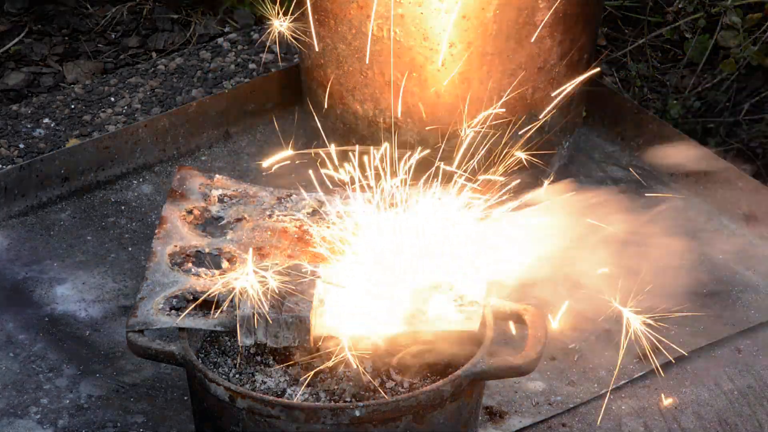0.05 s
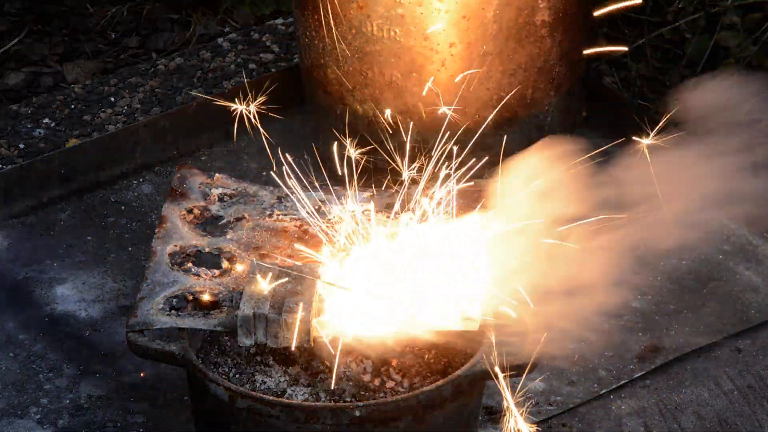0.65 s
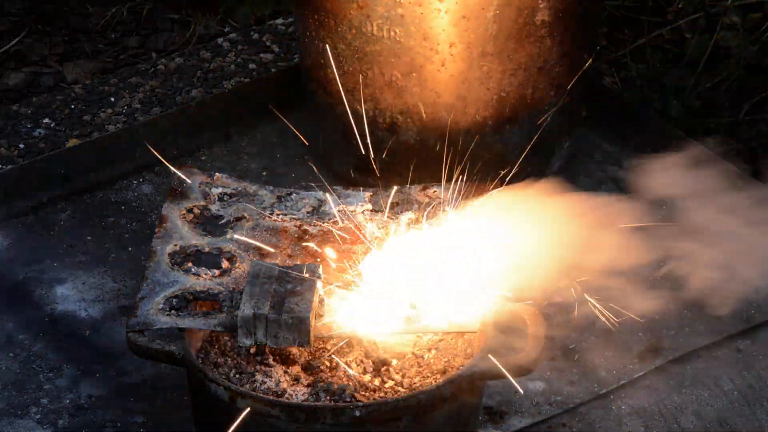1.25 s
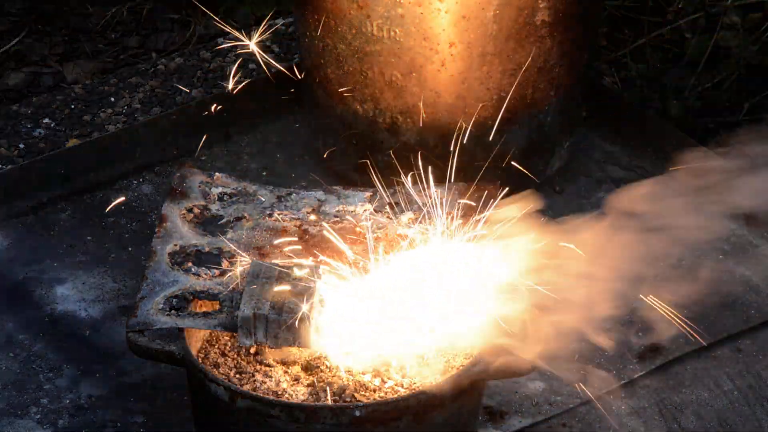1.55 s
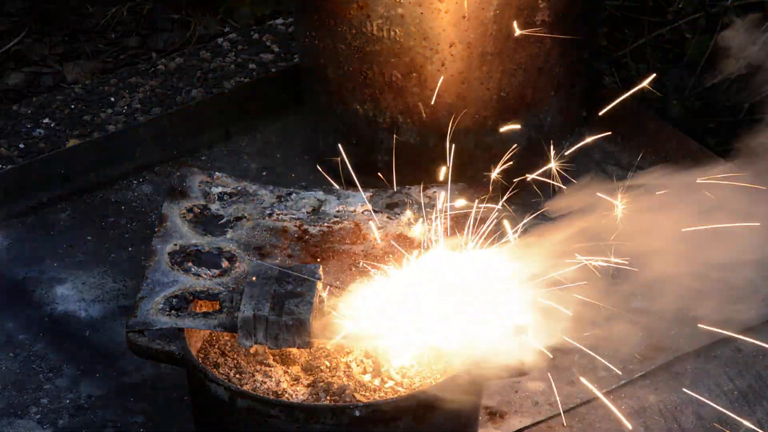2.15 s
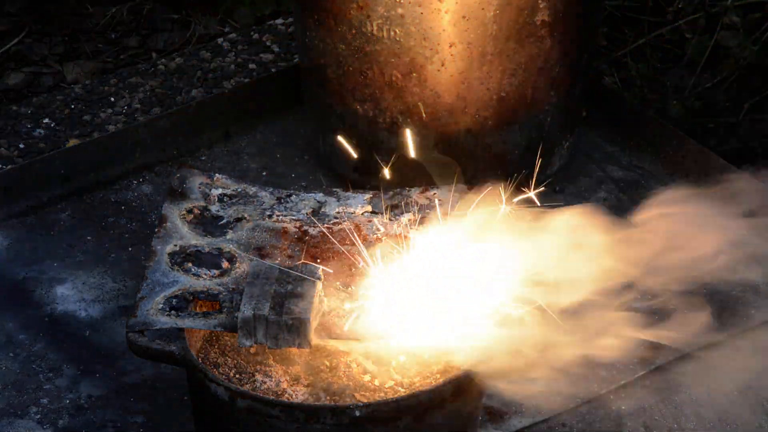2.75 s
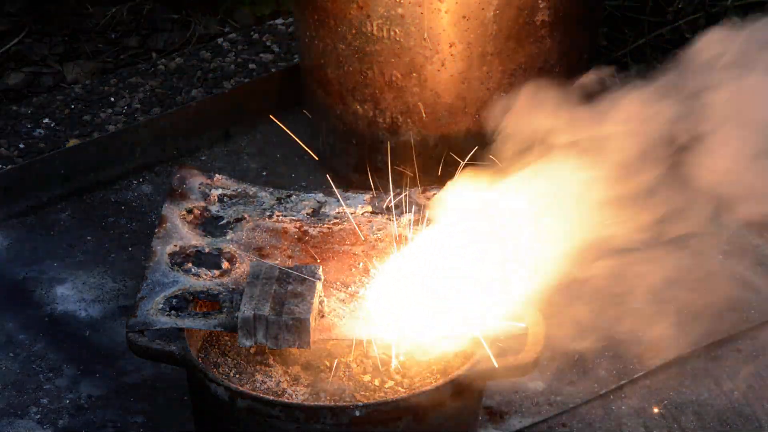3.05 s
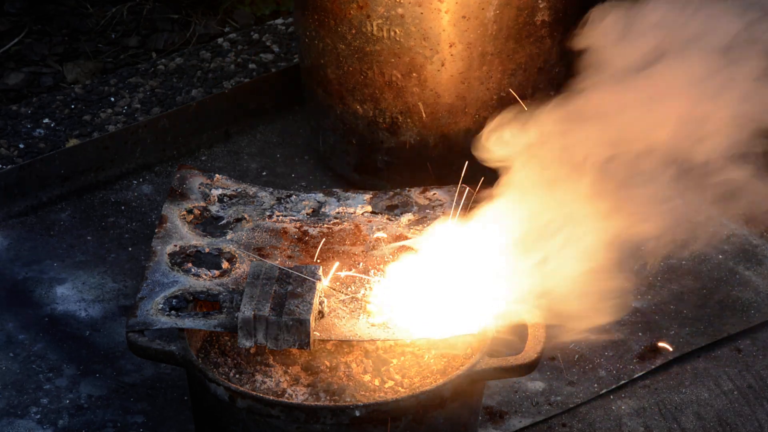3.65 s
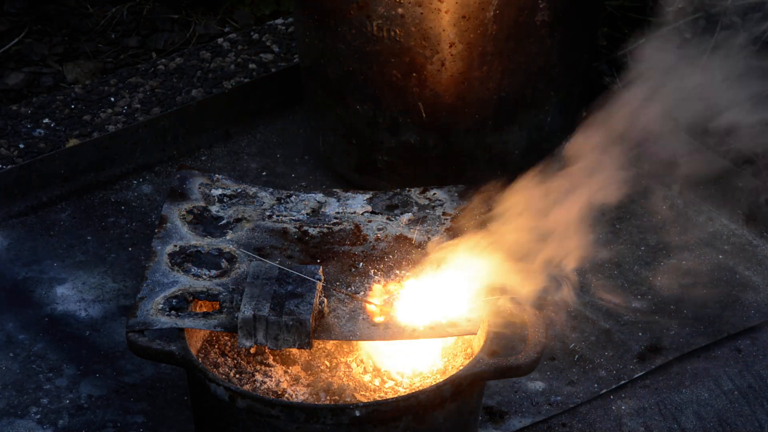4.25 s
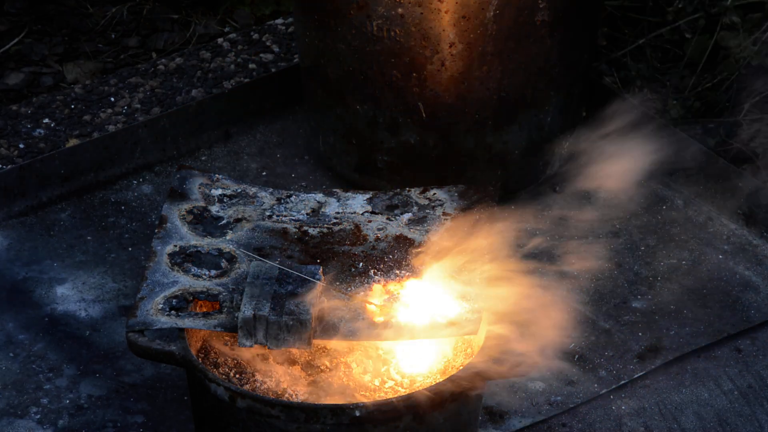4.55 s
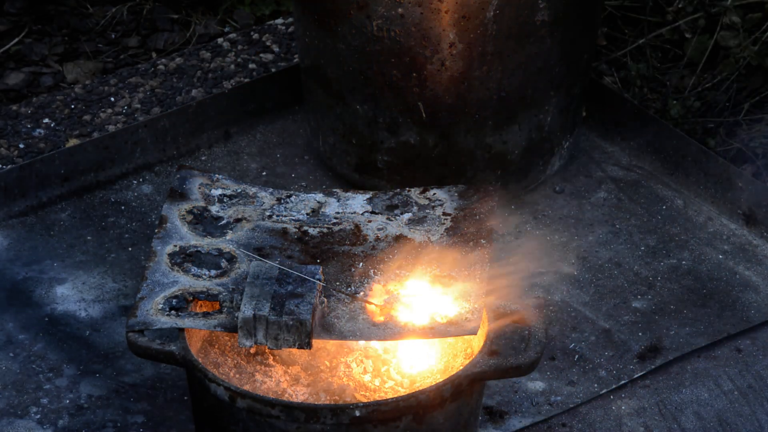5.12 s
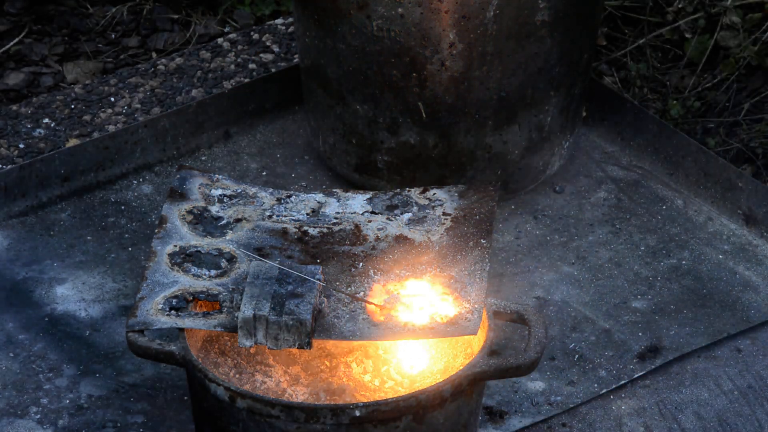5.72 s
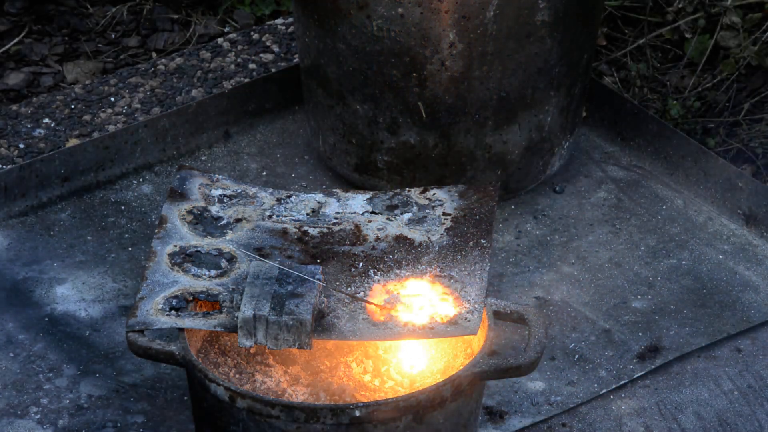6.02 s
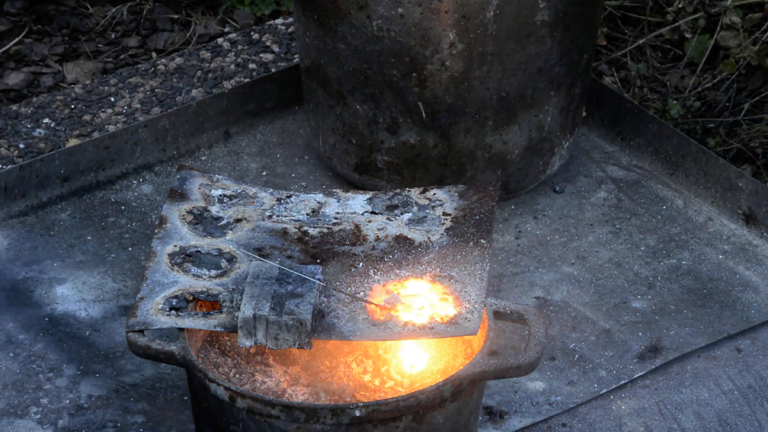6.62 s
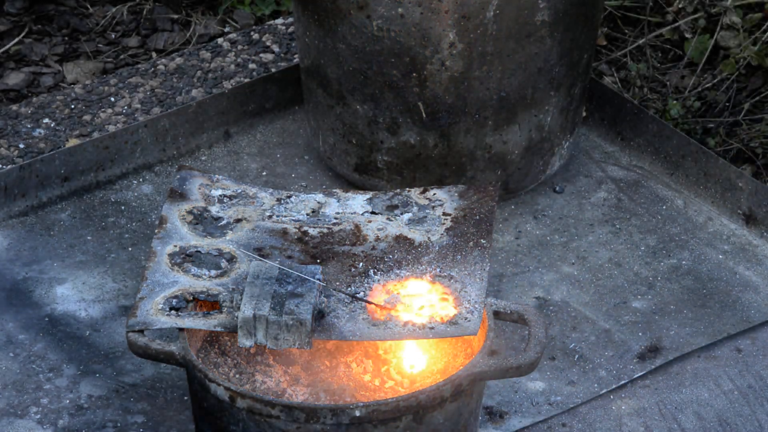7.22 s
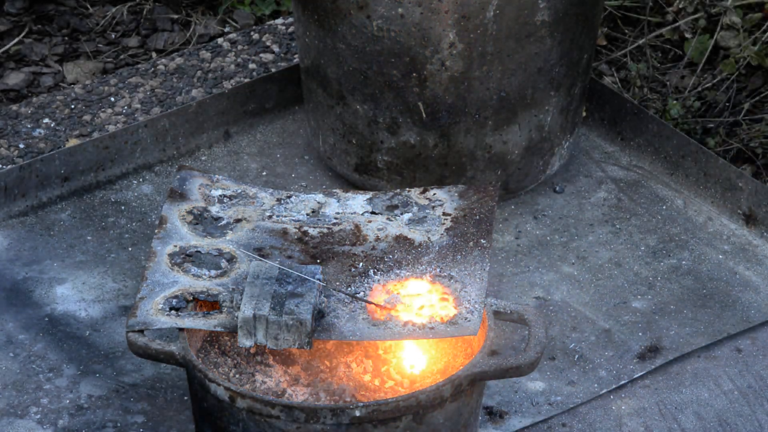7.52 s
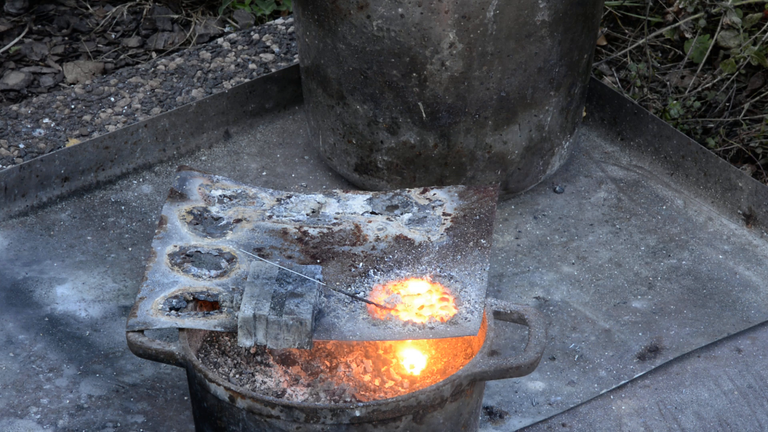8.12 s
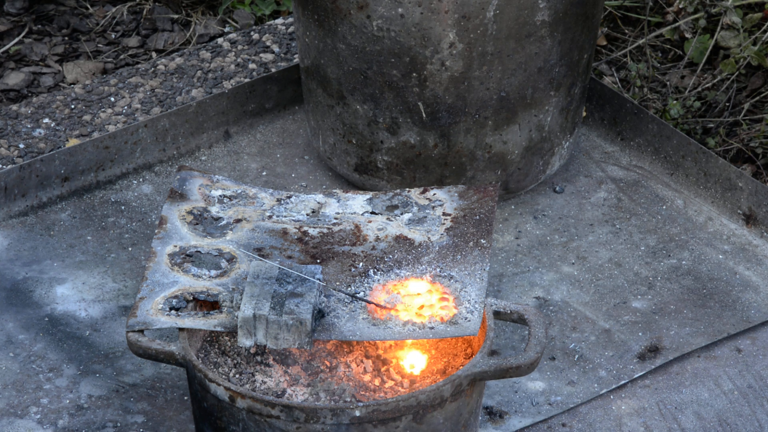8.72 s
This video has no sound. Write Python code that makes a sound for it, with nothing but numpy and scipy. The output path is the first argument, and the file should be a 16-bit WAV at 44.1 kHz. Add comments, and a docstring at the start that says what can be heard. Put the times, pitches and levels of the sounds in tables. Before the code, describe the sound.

Metal powder burns on a plate outdoors, close by, with a dense crackling roar and a bright hiss, loud from the start. Sharp spark pops cluster in the first 0.7 seconds. The hiss swells around 1.3 seconds and surges repeatedly from 2 to 3.3 seconds, with a few more pops. From about 3.6 seconds the flare weakens, fading away by around 5.5. From 4.2 seconds the glowing slag gives short gassy spurts, small bubbles, scattered cracks and fine ticks over a faint sizzle, thinning toward 8.5 seconds. A bush cricket buzzes high and thin throughout, clearer once the fire subsides. Hot air rumbles faintly, and soft low puffs bump the microphone between 5 and 8.2 seconds. One faint, short horn-like call sounds far away at 7.9 seconds. A soft nearby rustle rises from 8.5 seconds with two small scuffs. The evening air is quiet, without reverberation.

```python
"""Burning metal powder flares on a plate outdoors: countless tiny pops and rushing gas roar and hiss.
It dies down to glowing slag (the melted remains), which spurts, cracks, bubbles and ticks.
Hot air rumbles above it, and a steel drum and the tray behind it throw the sound back.
A bush cricket buzzes throughout and air bumps the microphone.
Near the end something calls once far away, and something rustles nearby."""
import sys
import numpy as np
from scipy import signal
from scipy.fft import rfft, irfft, next_fast_len
from scipy.io import wavfile
from scipy.ndimage import map_coordinates

SR = 44100
rng = np.random.default_rng(int(sys.argv[2]) if len(sys.argv) > 2 else 0)


def persist_wave(psi):
    """Save psi, clipped to +-1, as 16-bit WAV."""
    counts = np.round(np.clip(psi, -1, 1) * 32767).astype(np.int16)
    wavfile.write(sys.argv[1], SR, np.atleast_2d(counts).T)


N = 395577

# how hard the heap burns: t/s, level/dB
BURN = [(0.0, -33), (0.16, -33), (0.81, -36), (1.96, -37.5), (2.64, -38), (3.14, -38.5), (3.56, -39.5),
        (3.93, -45.5), (4.18, -47.5)]
# fresh powder catches and throws sparks: loudest at t/s, length/s, extra hiss/dB, extra roar/dB
SURGES = [(.225, .09, 2.3, 2.2), (.58, .05, .8, 1.5), (1.058, 0.041, -0.5, 0), (1.276, 0.36, 3, .6),
          (1.70, .04, 0, 2.5), (2.065, 0.1, 5.3, .8), (2.42, .13, 5, 2.2), (2.62, 0.15, 3.8, .3),
          (2.807, 0.16, 5.5, .8), (2.986, 0.084, 4.5, .8), (3.107, 0.054, 4, 1.5), (3.25, 0.067, 1.5, .8),
          (3.77, 0.068, 1.5, 0)]
# the tone of the roar, the hiss and the finest sparks and ticks: f/Hz, level/dB
ROAR_TONE = [(90, -35), (220, -14), (430, -15.5), (790, -6.5), (920, -13), (1300, -7), (1450, -6),
             (1650, 0), (1900, -1), (2080, -5), (2450, -3), (2820, -8.5), (3700, -7), (4800, -13.5),
             (12000, -30)]
HISS_TONE = [(1500, -34.5), (3500, -4.5), (5500, 1), (8000, 2), (12000, 1.5), (15500, 0.5)]
TICK_TONE = [(2000, -34), (7000, -16), (11000, 0), (14000, 5), (15500, -13)]

def flare(roar_trim_db, hiss_level_db, ring_db, spray_db):
    """The burning heap roars and hisses, then fades as the powder runs out."""
    steady_db, spent_s, fade_db_per_s = -38, 4.18, 20.5
    t = np.arange(N) / SR
    burn_db, = curves(BURN)
    surge_db, surge_roar_db = sum(np.outer(extra_db, .5 ** ((2 * (t - at) / length) ** 2))
                                  for at, length, *extra_db in SURGES)
    hiss_db = hiss_level_db + 0.96 * (burn_db - steady_db) + surge_db  # a harder burn hisses more
    flutter = wobble(45)  # shared by roar and hiss
    roar = amp(roar_trim_db) * coloured(crackle(rate=2500, scatter_db=4.0, gas_db=4.5), ROAR_TONE)
    roar += hollows(ring_db)
    hiss = coloured(crackle(rate=5000, scatter_db=6.5, gas_db=4), HISS_TONE)
    roar *= amp(burn_db + surge_roar_db + 0.57 * flutter + 0.62 * wobble(110))
    hiss *= amp(hiss_db + 0.37 * flutter + 0.73 * wobble(18))
    spray = coloured(crackle(rate=2200, scatter_db=7, gas_db=-6), TICK_TONE)
    spray *= amp(hiss_db + spray_db + 2 * surge_db)  # fine sparks stand out in the surges
    return (roar + hiss + spray) * amp(-fade_db_per_s * np.maximum(t - spent_s, 0))


# hollows around the heap: f/Hz, width/Hz, level/dB, loudest at t/s, swell time/s
HOLLOWS = [(367, 42, -25, 3.9, 5.1), (547, 140, -19, 3, 1.4), (1155, 310, -13, 0.23, 0.7),
           (1563, 110, -16, 2, 4), (1814, 130, -8, 3.04, 0.64), (2270, 89, -6.5, 2.76, 1.3),
           (2388, 110, -12, 3.1, 0.41), (3008, 114, -13, 0.74, 2.5), (3480, 350, -7.5, 0.47, 0.93),
           (3360, 140, -14.5, 2.7, 1.7), (3955, 190, -10.5, 2.84, 1.04)]

def hollows(level_db):
    """One hollow after another rings as the burning front passes it."""
    t, out = np.arange(N) / SR, np.zeros(N)
    for hz, width, db, at, swell_s in HOLLOWS:
        resonance = lambda f: (1j * f * width / (hz * hz - f * f + 1j * f * width)) ** 2
        ring = unit(filtered(rng.standard_normal(N), resonance))
        swell = np.exp(-.5 * ((t - at) / swell_s) ** 2)
        out += amp(db + level_db + wobble(9)) * swell * ring
    return out


# gas breaking out of the slag: t/s, length/s, level/dB, growth/dB, gurgle/dB, hiss/dB
SPURTS = [(4.202, .11, -42, 5, -8, -4), (4.346, 0.099, -48.5, -3, -4.5, -2), (4.888, .05, -52, -4, -11, 0),
          (5.129, 0.072, -52.5, -7, -9, -3), (5.645, .025, -54, -4, -18, 3),
          (6.335, 0.016, -47.5, 1, -20, -2), (6.812, 0.11, -48.5, 5, -17, -2),
          (7.605, 0.073, -50.5, 6, -13, 4)]
# the tone of crackling slag and of its hollow gurgle: f/Hz, level/dB
SLAG_TONE = [(100, -30.5), (350, -10), (700, -1), (1100, -7.5), (1350, -2), (1680, -4.5), (1880, 3),
             (2250, 1.5), (2600, 2.5), (3100, -10.5), (3650, -5), (4000, -1.5), (4550, -2), (4900, -9),
             (5700, -8), (12000, -17.5)]
GURGLE_TONE = [(200, -27), (540, -15), (700, 1), (790, 3), (920, -17.5), (3000, -25.5)]

def spurts(level_db):
    """Gas forces its way through the melt: a coarse crackle over a hollow gurgle."""
    body, gurgle, hiss = np.zeros((3, 2, N))
    stream = crackle(rate=1500, scatter_db=1, gas_db=-6.5) * amp(level_db + 1.8 * wobble(110))
    for start, length, db, growth_db, gurgle_db, hiss_db in SPURTS:
        gas = stream * amp(db) * envelope(start, length, attack=0.0072, t60=0.18, growth_db=growth_db)
        body += gas
        gurgle += amp(gurgle_db) * gas
        hiss += amp(hiss_db) * gas
    gurgle *= amp(3.8 * wobble(35))
    return coloured(body, SLAG_TONE) + coloured(gurgle, GURGLE_TONE) + coloured(hiss, HISS_TONE)


# sparks bursting and slag cracking: t/s, level/dB, extra treble/dB
POPS = [(0.082, -23, -23), (0.191, -19, -19), (0.261, -23, -26), (0.334, -17, -28), (0.582, -20, -20),
        (0.655, -22, -18), (2.385, -23, -22), (2.445, -21.5, -3), (2.808, -24, 0), (3.413, -27, -14),
        (4.215, -30, -11), (4.307, -29.5, -27), (4.415, -30.5, -20), (4.504, -35.5, -14),
        (4.695, -39.5, -12), (4.751, -38, -9), (5.143, -39, -12), (5.189, -44, 7), (5.65, -34, -1.5),
        (5.809, -38, -21), (5.925, -39, -6), (6.297, -35.5, -6), (6.351, -32.5, -6), (6.505, -32.5, -16),
        (6.571, -37, -10), (6.651, -37.5, -12), (6.734, -38, -4), (6.814, -33, -22), (6.88, -32.5, -17),
        (6.912, -31, -18), (6.984, -36.5, -4), (7.065, -39, -13), (7.155, -48, 7), (7.325, -53, 8),
        (7.638, -43, 10), (7.678, -30, -29), (8.109, -39, -16), (8.231, -46, 2)]

def pops(level_db, treble_db, fizz_db, fizz_t60, chips_db, chips_s):
    """Each pop is a sharp snap inside a brief spray of chips, then a fizz of escaping gas."""
    body, treble = np.zeros((2, 2, N + SR))
    lead = SR // 100  # samples before the snap
    t = (np.arange(SR // 10) - lead) / SR
    chips = amp(chips_db) * np.exp(-np.abs(t) / chips_s)
    fizz = (t > 0) * amp(fizz_db - 60 * np.abs(t) / fizz_t60)
    for at, db, bright_db in POPS + faint_pops(count=16, first_s=4.4, last_s=8.8):
        burst = (chips + fizz) * rng.standard_normal((2, len(t)))
        burst[0, lead] = 1  # the snap, midway between left and right
        start = round(at * SR) - lead
        body[:, start:start + len(t)] += amp(db + level_db) * burst
        treble[:, start:start + len(t)] += amp(db + bright_db + treble_db) * burst
    return spread(coloured(body[:, :N], SLAG_TONE) + coloured(treble[:, :N], HISS_TONE), FIRE_LIKENESS)


def faint_pops(count, first_s, last_s):
    """Smaller cracks at random times and sizes, as rows like those of POPS."""
    return [(first_s + (last_s - first_s) * when, -44.5 + 6 * (size - .5), -11 + 12 * (tone - .5))
            for when, size, tone in rng.random((count, 3))]


def embers(gurgle_db, hiss_db, tick_t60):
    """The slag starts to sizzle as the flare dies, then cools; its crust gives off fine, bright ticks."""
    start_s, rise_s, cooling_s = 3.7, 0.7, 2.8
    hot_db, cold_db, ticks_per_s = -53.5, -75.5, 70
    age = np.arange(N) / SR - start_s
    heat = np.clip(age / rise_s, 0, 1) * np.exp(-np.maximum(age - rise_s, 0) / cooling_s)
    heat_db = cold_db + (hot_db - cold_db) * heat
    gas = crackle(rate=540, scatter_db=6.5, gas_db=-1) * amp(heat_db + 1.5 * wobble(25))
    gurgle = amp(gurgle_db + 3.8 * wobble(15)) * coloured(gas, GURGLE_TONE)
    simmer = coloured(gas, SLAG_TONE) + gurgle + amp(hiss_db) * coloured(gas, HISS_TONE)
    cracks = (rng.random(N) < ticks_per_s / SR) * amp(rng.uniform(-20, 0, N))
    tick_fade = amp(-60 * np.arange(SR // 50) / SR / tick_t60)
    ticks = signal.fftconvolve(cracks, tick_fade)[:N] * rng.standard_normal((2, N))
    ticks = unit(coloured(spread(ticks, FIRE_LIKENESS), TICK_TONE))
    return simmer + amp(-33.5 + heat_db / 2) * ticks  # ticks fade more slowly than the simmer


# bubbles bursting in the melt: t/s, level/dB
BUBBLES = [(4.212, -45), (4.244, -56), (4.298, -45.5), (4.413, -42.5), (4.66, -56), (4.8, -55),
           (4.929, -54), (5.14, -49), (5.769, -52), (6.345, -52.5), (6.91, -43), (8.45, -52)]

def bubbles(level_db, t60):
    """A bursting bubble puffs through its hollow."""
    puffs = amp(level_db) * sum(strike(at, db, t60) for at, db in BUBBLES)
    return coloured(puffs * rng.standard_normal(N), GURGLE_TONE)


# hot air rising from the plate: t/s, level/dB
DRAUGHT = [(0, -65), (3.2, -71), (3.65, -60.5), (4.1, -68.5), (7, -85)]
# the tone of its rumble: f/Hz, level/dB
DRAUGHT_TONE = [(40, -22), (100, -10.5), (175, 0.5), (260, -6.5), (600, -24)]

def draught():
    """Hot air rumbles softly above the plate."""
    gain = amp(curves(DRAUGHT)[0] + 1.3 * wobble(6.7))
    return gain * unit(coloured(rng.standard_normal(N), DRAUGHT_TONE))


# echoes off the drum and the tray: delay/s, gain
ECHOES = [(.00578, 0.016), (.0066, -0.29), (.00803, 0.1), (.00887, 0.12)]

def metal_echoes(x):
    """Close metal walls add quick echoes that colour the sound; the open air adds no tail."""
    return filtered(x, lambda hz: 1 + sum(gain * delayed(hz, delay) for delay, gain in ECHOES))


# how loudly the bush cricket buzzes: t/s, level/dB
CRICKET = [(0, -61), (3.8, -49.5), (4.95, -47.5), (5.5, -52.5), (6.4, -51.5), (7.3, -52), (8.1, -49),
           (8.5, -50)]
# its three wing strokes: place in the cycle (0 to 1), width/s, level/dB
WING_STROKES = [(.015, 0.0024, 3), (.365, 0.0034, -1.5), (.7, 0.0051, 3)]
# the tone of its wings and of the farther crickets: f/Hz, level/dB
WING_TONE = [(6000, -46), (8400, -25.5), (9150, -15), (9450, -11.5), (9750, -5), (10100, -3.5),
             (10450, -12.5), (10850, -12.5), (11600, -21.5), (13000, -25), (15500, -33)]
CHORUS_TONE = [(7000, -44), (8200, -13.5), (9100, -4.5), (9800, -1.5), (10800, -0.5), (11500, -9),
               (12300, -21), (15000, -41)]

def cricket(level_db, between_db, chorus_db):
    """Wings rasp in threes and ring brightly; farther crickets blur into a haze."""
    cycles_per_s = 16.845
    phase = np.arange(N) / SR * cycles_per_s + .015 * wobble(3)
    strokes = np.zeros(N)
    for place, width, db in WING_STROKES:
        offset_s = ((phase - place + .5) % 1 - .5) / cycles_per_s
        strokes += amp(db) * np.exp(-.5 * (offset_s / width) ** 2)
    effort = unit(strokes * amp(1.6 * wobble(50)) + amp(between_db))
    rasp = spread(rng.standard_normal((2, N)), likeness=[(10000, 0.35)])
    wings = coloured(effort * rasp, WING_TONE)
    with_ground_echo = filtered(wings, lambda hz: 1 + 0.48 * delayed(hz, 0.0036))
    chorus = amp(chorus_db + 1.5 * wobble(30)) * air(CHORUS_TONE)
    lean_left = amp([[.4], [-.4]])
    return amp(curves(CRICKET)[0] + level_db) * unit(with_ground_echo) * lean_left + chorus


# air bumping the microphone: t/s, level/dB, length/s, f/Hz
AIR_BUMPS = [(5.012, -48, 0.046, 99), (5.285, -65, .07, 65), (5.472, -57, 0.088, 60), (5.611, -58, .08, 52),
             (5.744, -58, .07, 86.5), (5.848, -59, 0.089, 51.6), (6.772, -56, 0.048, 68),
             (7.184, -63, .08, 60), (7.375, -63, .12, 58), (8.2, -61, .05, 95)]

def air_bumps(level_db):
    """Puffs of air thud softly on the microphone: a few uneven low swings, different left and right."""
    t, out = np.arange(N) / SR, np.zeros((2, N))
    swirl = np.array([wobble(45), wobble(45)])
    for at, db, length, hz in AIR_BUMPS:
        age = np.maximum(t - at + 0.0042, 0)
        rise = age / (length / 4)
        out += amp(db + level_db) * rise * np.exp(1 - rise) * np.sin(2 * np.pi * hz * age + swirl)
    return out


# the overtones of the far call: multiple of the pitch, level/dB
CALL_OVERTONES = [(2, -1), (3, -2), (4, -6), (5, -13)]

def far_call(start_s, level_db):
    """One faint, horn-like note from far away starts quickly, then sags in pitch and level."""
    final_hz, sag_hz, sag_s = 447, 26.3, 0.063
    age = np.maximum(np.arange(N) / SR - start_s, 0)
    pitch_hz = (final_hz + sag_hz * np.exp(-age / sag_s)) * (1 + .012 * wobble(120))
    phase = 2 * np.pi * np.cumsum(pitch_hz) / SR
    note = np.sqrt(2) * sum(amp(db + 2.0 * wobble(40)) * np.sin(k * phase) for k, db in CALL_OVERTONES)
    return amp(level_db) * envelope(start_s, length=.2, attack=.015, t60=0.34, growth_db=-3) * note


# the tone of the rustle: f/Hz, level/dB
RUSTLE_TONE = [(150, -19), (450, -5), (950, 4), (1600, 1), (2600, -11.5), (8000, -24)]

def rustle(start_s, rise_s, level_db):
    """A soft rustle nearby swells and stays, with two sharper scuffs in it."""
    swell = amp(level_db) * np.clip((np.arange(N) / SR - start_s) / rise_s, 0, 1)
    scuffs = strike(at=8.775, db=-46, t60=0.04) + strike(at=8.86, db=-52, t60=0.04)
    return (swell + scuffs) * coloured(crackle(rate=400, scatter_db=5, gas_db=6), RUSTLE_TONE)


# a far motor and a thin electronic whine: f/Hz, level/dB
HUM = [(84, -80), (15690, -63.5)]

def hum():
    """A motor and some electronics each hold one tone that wavers slightly in level."""
    t = np.arange(N) / SR
    return sum(np.sqrt(2) * amp(db + .7 * wobble(6)) * np.sin(2 * np.pi * hz * t) for hz, db in HUM)


# the tone of the evening air: f/Hz, level/dB
EVENING_TONE = [(20, -21), (50, -8.5), (110, -5.5), (200, -4.5), (400, -1.5), (700, 0), (1150, 1),
                (2000, -4.5), (4000, -5.5), (7000, -8.5), (11000, -11), (15500, -7)]

def evening(level_db):
    """Still outdoor air makes a faint hush."""
    return amp(level_db + 0.74 * wobble(3.015)) * air(EVENING_TONE)


# how alike left and right are in the surroundings: f/Hz, likeness (1 = the same)
AIR_LIKENESS = [(60, 0.63), (150, 0.92), (380, 0.72), (950, 0.77), (2380, 0.54), (5980, 0.31), (15000, 0.2)]

def air(tone):
    """Noise from all around, at an average (rms) level of 1."""
    return unit(coloured(spread(rng.standard_normal((2, N)), AIR_LIKENESS), tone))


# how alike left and right are in the fire: f/Hz, likeness (1 = the same)
FIRE_LIKENESS = [(200, 0.99), (1500, 1), (3000, 0.99), (5000, 0.96), (8000, 0.71), (15000, 0.64)]

def crackle(rate, scatter_db, gas_db):
    """Tiny pops of mixed sizes, about rate of them a second, over rushing gas, in stereo."""
    sizes = amp(scatter_db * np.minimum(rng.standard_normal(N), 2.5))
    clicks = unit((rng.random(N) < rate / SR) * sizes * rng.choice([-1, 1], N))
    middle = unit(clicks + amp(gas_db) * rng.standard_normal(N))
    return spread([middle, rng.standard_normal(N)], FIRE_LIKENESS)


def envelope(start, length, attack, t60, growth_db):
    """A gain that rises, grows or sags for its length, then drops 60 dB in t60 seconds."""
    age = np.maximum(np.arange(N) / SR - start, 0)
    held_db = growth_db * (np.minimum(age / length, 1) - .5)
    return (1 - np.exp(-age / attack)) * amp(held_db - 60 * np.clip((age - length) / t60, 0, 2))


def strike(at, db, t60):
    """A gain that jumps up, then drops 60 dB in t60 seconds."""
    age = np.arange(N) / SR - at
    return (age > 0) * amp(db - 60 * np.abs(age) / t60)


def amp(db):
    """Turns decibels into a gain to multiply by."""
    return 10 ** (np.asarray(db) / 20)


def unit(x):
    """Scales x to an average (rms) level of 1."""
    return x / np.sqrt(np.mean(x ** 2) + 1e-20)


def along(points, hz):
    """Reads between (f/Hz, value) points on a log frequency scale."""
    f, v = np.transpose(points)
    return np.interp(np.log(hz + 1), np.log(f + 1), v)


def curves(rows):
    """One value per sample for each column after the time."""
    times, *columns = np.transpose(rows)
    return [np.interp(np.arange(N) / SR, times, column) for column in columns]


def wobble(rate):
    """A smooth curve through rate random points a second."""
    return map_coordinates(rng.standard_normal(int(N * rate / SR) + 4), [np.arange(N) * rate / SR])


def delayed(hz, seconds):
    """The filter response that makes a sound arrive later."""
    return np.exp(-2j * np.pi * hz * seconds)


def filtered(x, response):
    """Scales and shifts each frequency in x by response(hz)."""
    size = 2 * next_fast_len(N // 2 + SR // 4)
    return irfft(rfft(x, size) * response(np.fft.rfftfreq(size, 1 / SR)), size)[..., :N]


def coloured(x, tone):
    """Gives x this tone; white noise keeps its power."""
    def response(hz):
        cepstrum = irfft(np.log(unit(amp(along(tone, hz))) + 1e-6))
        cepstrum[1:len(hz) - 1] *= 2  # folded so the filter rings only after a sound, never before
        cepstrum[len(hz):] = 0
        return np.exp(rfft(cepstrum))
    return filtered(x, response)


def spread(pair, likeness):
    """Mixes two unrelated signals into a left and right of the given likeness."""
    turn = lambda hz: np.arccos(np.clip(along(likeness, hz), -1, 1)) / 2
    mid, side = filtered(pair, lambda hz: np.array([np.cos(turn(hz)), np.sin(turn(hz))]))
    return np.array([mid + side, mid - side])


def scene():
    """The fire with its echoes, and the evening around it."""
    fire = flare(roar_trim_db=-2.0, hiss_level_db=-38.9, ring_db=-2.5, spray_db=-17.5)
    fire += spurts(level_db=-2.5) + draught()
    fire += embers(gurgle_db=-8.5, hiss_db=-1.0, tick_t60=.012) + bubbles(level_db=2.5, t60=0.084)
    fire += pops(level_db=7.5, treble_db=12.0, fizz_db=-23.5, fizz_t60=0.078,
                 chips_db=-19.5, chips_s=0.002)
    around = cricket(level_db=0.5, between_db=-13, chorus_db=-54.5) + air_bumps(level_db=-1)
    around += far_call(start_s=7.89, level_db=-61) + hum()
    around += rustle(start_s=8.45, rise_s=.38, level_db=-56.5) + evening(level_db=-54.5)
    return metal_echoes(fire) + around


def record(dry):
    """Cuts off the very highest treble."""
    return filtered(dry, lambda hz: hz < 15800)


dry = scene()
out = record(dry)
persist_wave(out)
```